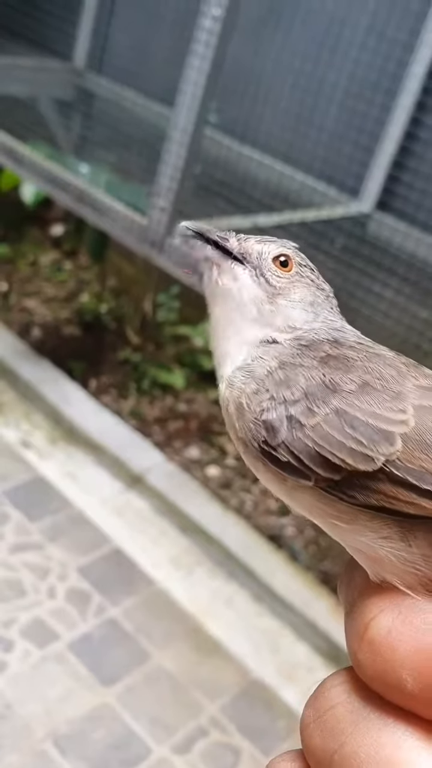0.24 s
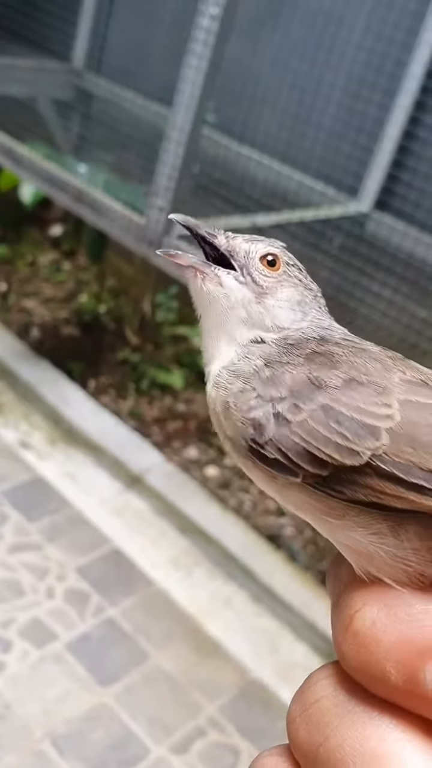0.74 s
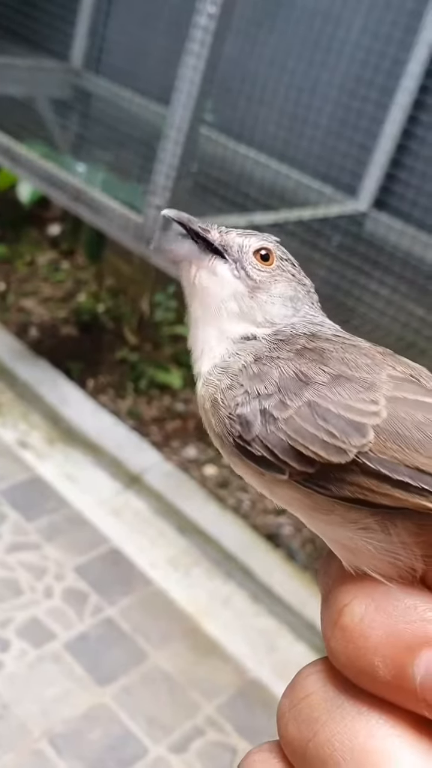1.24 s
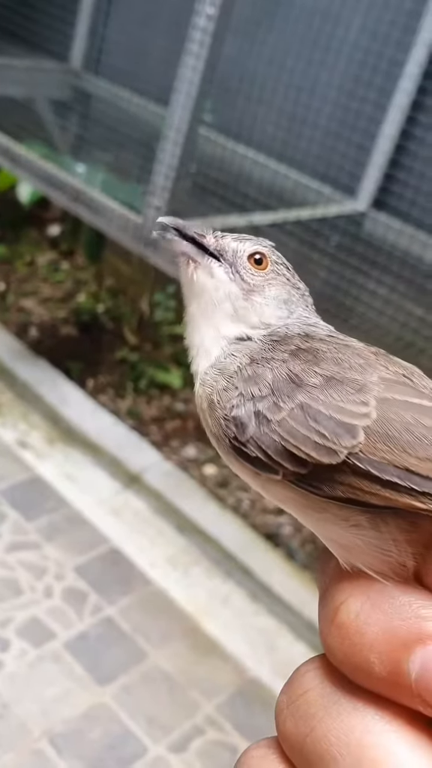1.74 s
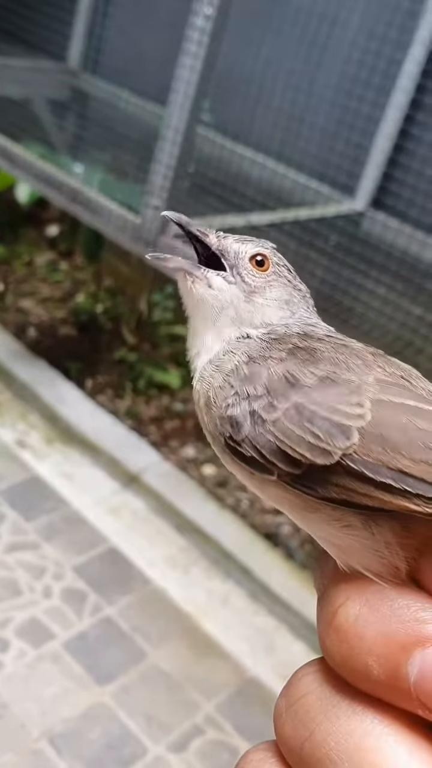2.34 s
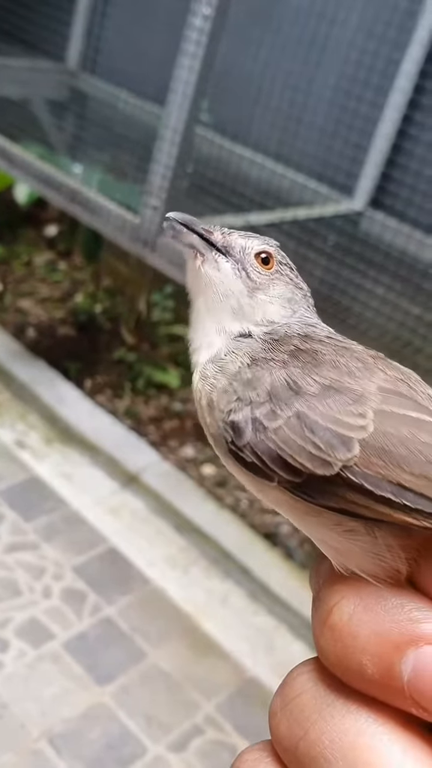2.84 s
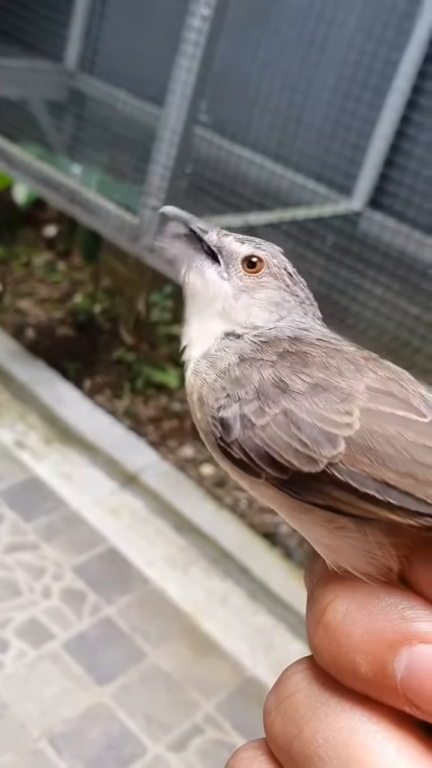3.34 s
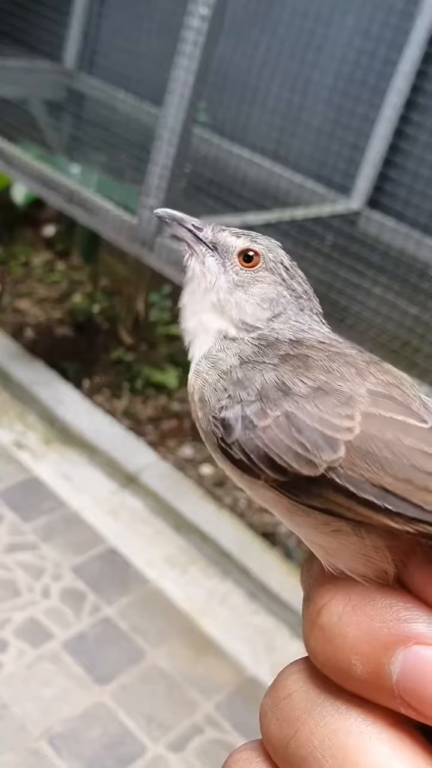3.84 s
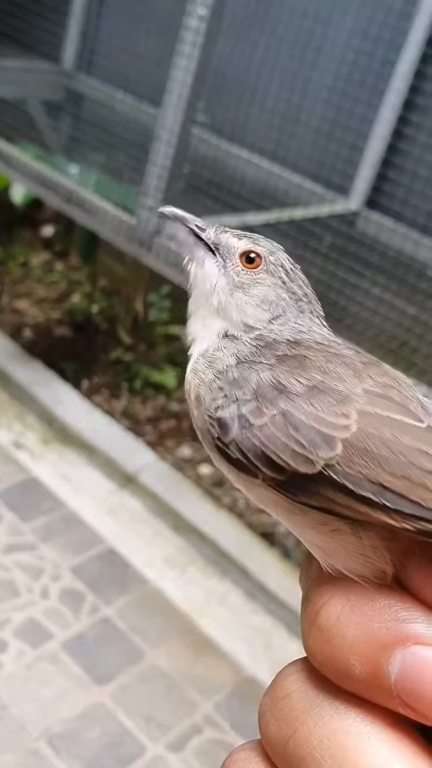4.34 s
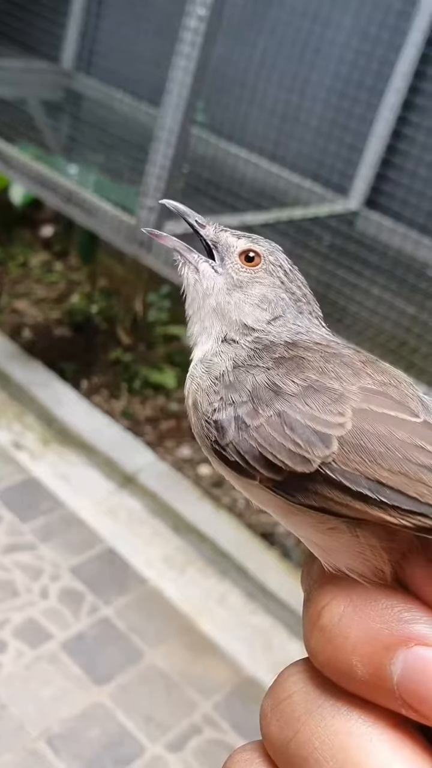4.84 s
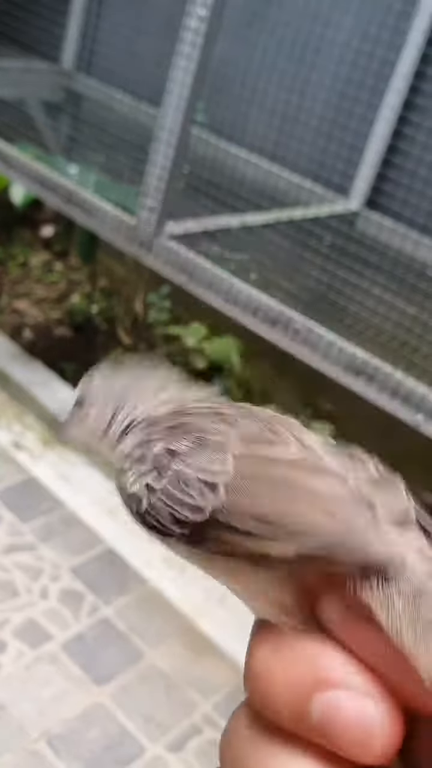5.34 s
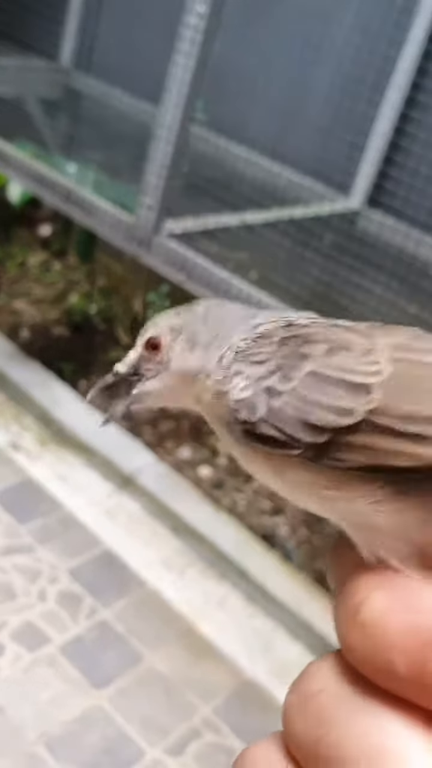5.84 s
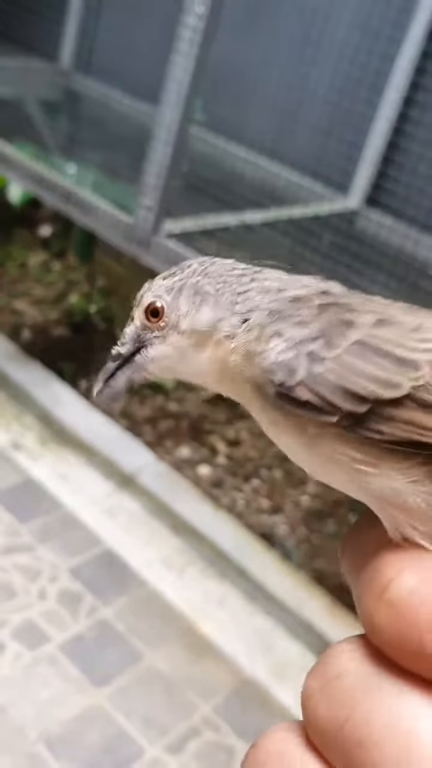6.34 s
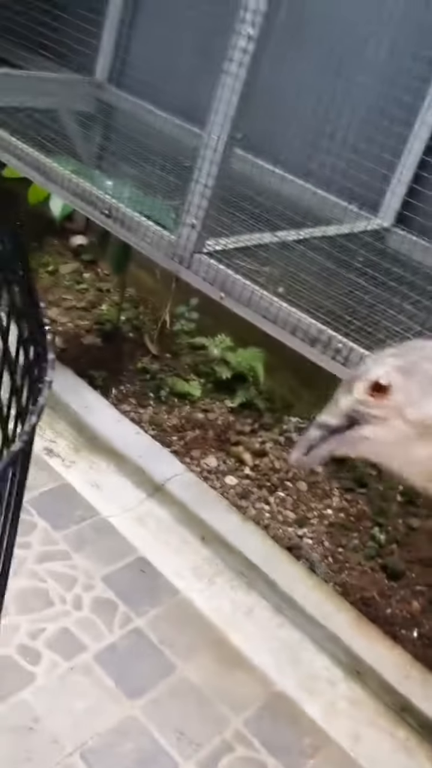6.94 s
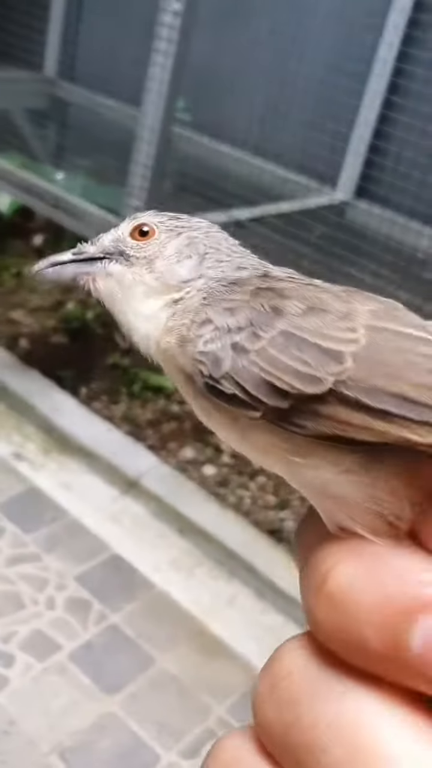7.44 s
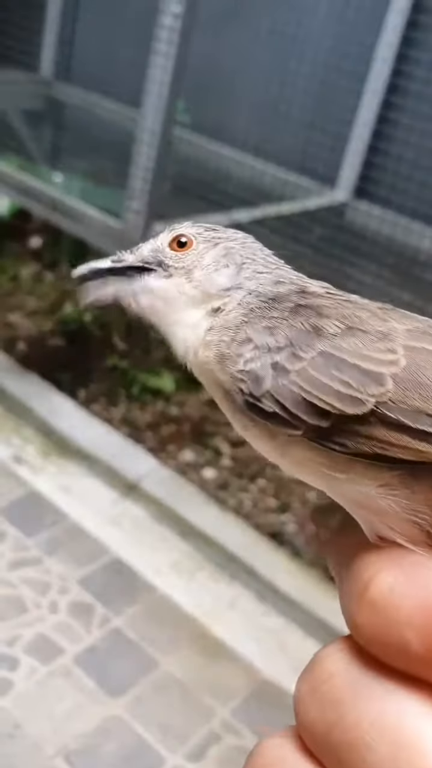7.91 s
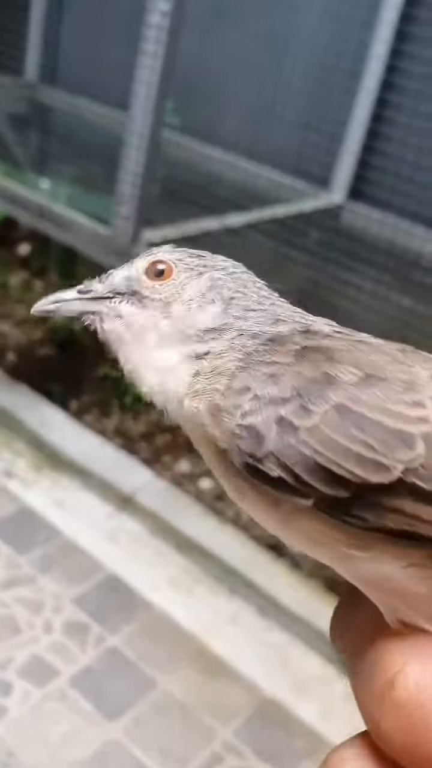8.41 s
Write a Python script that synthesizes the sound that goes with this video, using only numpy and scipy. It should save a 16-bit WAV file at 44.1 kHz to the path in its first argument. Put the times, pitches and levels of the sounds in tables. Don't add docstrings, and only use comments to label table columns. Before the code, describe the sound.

A small warbler sings very close to a phone microphone in a hard-walled yard. Short phrases of falling and rising whistles lead into a long, even, rapid trill. It stops, leaving sparse cheeps and faint whistles from other birds amid near silence, then a second trill bursts out, harsher and brighter, running to the end. Quick echoes surround the notes, with faint rustle and low rumble beneath.

```python
import sys
import numpy as np
from scipy import signal
from scipy.fft import rfft, irfft, next_fast_len
from scipy.io import wavfile
from scipy.ndimage import uniform_filter1d

SR = 44100
rng = np.random.default_rng(int(sys.argv[2]) if len(sys.argv) > 2 else 0)


def boost(x):
    u = np.asarray(x, float) / 20
    return 10 ** u


def output_pcm(signal):
    pcm = np.clip(np.atleast_2d(signal).T, -1, 1) * 32767
    wavfile.write(sys.argv[1], SR, np.round(pcm).astype(np.int16))


N = 382347
LEAD = 4410

# t/s when passing 4500 Hz, level/dB
TRILL_UP = [(2.6687, -7), (2.7326, -6.5), (2.7973, -6.5), (2.8631, -7), (2.9281, -5.5), (2.994, -6),
            (3.0605, -6.5), (3.1282, -5.5), (3.1992, -6.5), (3.2644, -7), (3.3316, -6.5), (3.3963, -7.5),
            (3.4634, -7.5), (3.531, -6.5), (3.5997, -7.5), (3.6664, -7.5), (3.7338, -7), (3.8007, -7.5),
            (3.8669, -7.5), (3.937, -6.5), (4.0043, -6.5), (4.0729, -7), (4.1409, -6.5), (4.209, -5.5),
            (4.277, -6.5), (4.3449, -7), (4.4148, -5.5), (4.4834, -5), (4.5504, -7.5), (4.62, -7)]
# t/s when passing 4500 Hz, level/dB
TRILL_DOWN = [(6.2303, -8), (6.293, -7.5), (6.3566, -8), (6.4213, -7.5), (6.488, -7.5), (6.5529, -7.5),
              (6.62, -7.5), (6.6844, -7.5), (6.7504, -6.5), (6.8159, -7.5), (6.8833, -6), (6.9514, -7.5),
              (7.0169, -8.5), (7.0833, -8), (7.1507, -8), (7.2221, -8), (7.2884, -7)]
# t/s when passing 4500 Hz, level/dB
TRILL_END = [(7.3546, -6), (7.4242, -4.5), (7.4902, -5), (7.5558, -5.5), (7.624, -5), (7.692, -4.5),
             (7.7586, -4.5), (7.826, -5.5), (7.8923, -4.5), (7.9598, -4.5), (8.0294, -5), (8.098, -5),
             (8.1653, -4.5), (8.2322, -4.8), (8.3018, -5), (8.3699, -5), (8.4381, -4.5), (8.5079, -4),
             (8.5743, -5.5), (8.6412, -6)]
# t/s, microphone bend level/dB
POSE = [(0, -18.5), (1, -21.5), (2, -19), (3.5, -18), (4.7, -19.5), (6.07, -16), (6.1, 0), (6.5, -3),
        (6.9, -4), (7.05, 1.5), (7.25, 2.5), (7.37, -8), (7.5, -17.5), (8.7, -14)]


def in_time(rows):
    s, *columns = np.transpose(rows)
    return [np.interp(np.arange(N) / SR, s, column) for column in columns]


def band(x, low_hz, high_hz, order=3):
    return signal.sosfilt(signal.butter(order, [low_hz, high_hz], "band", fs=SR, output="sos"), x)


def coloured(spectrum, low_hz, high_hz):
    size = next_fast_len(N)
    hz = np.arange(1, size // 2 + 2) * SR / size
    points = np.array(spectrum)
    gain = boost(np.interp(np.log(hz), np.log(points[:, 0]), points[:, 1], right=-90))
    noise = irfft(rfft(rng.standard_normal(size)) * gain, size)[:N]
    return noise / np.std(band(noise, low_hz, high_hz))


def wobble(rate_hz, size):
    low_pass = signal.butter(2, rate_hz, fs=SR, output="sos")
    slow = signal.sosfilt(low_pass, rng.standard_normal(size + 2000))[2000:]
    return slow / np.std(slow)


def add(out, s, sound):
    i = round(s * SR) + LEAD
    out[i:i + len(sound)] += sound[:len(out) - i]


def warbler():
    # t/s when passing 4500 Hz, level/dB, speed, top f/Hz,
    # brightness level/dB
    openers = [(-.026, -12, 0.78, 6050, 6), (0.393, -13.5, 1, 5600, -2), (1.1082, -11.5, 0.89, 5570, -1),
               (1.7835, -10.5, .85, 5700, -5.5), (1.8451, -14.5, 1.36, 5580, -2),
               (1.901, -12, 1.35, 5500, -3.5), (1.9536, -10, 1.46, 5620, 0.5),
               (2.0048, -9.5, 1.3, 5700, -1), (2.0566, -8, 1.15, 5640, 0.7), (2.109, -8.5, 1.1, 5560, -1),
               (2.161, -7.5, 1.17, 5720, -2), (2.2151, -7.5, 0.98, 5740, -3),
               (2.5438, -10, 0.83, 5500, -0.2), (2.6056, -12.5, 1.47, 5250, -1.5),
               (6.1073, -12, 1.02, 5760, -2.8), (6.1702, -6.5, 1.26, 5980, -2.5)]
    # t/s, level/dB at 3400 Hz
    swallowed = [
        (1.163, -29),
        (2.2795, -21),
    ]
    # speed, top f/Hz, level/dB at 4300 Hz under the top part,
    # level/dB at 3400 Hz
    voices = [
        (1.14, 6256, 0.7, -10.5),
        (1.12, 6270, -1, -11.5),
        (1.11, 6340, -0.2, -10),
    ]
    # t/s when passing 4500 Hz, level/dB, speed, brightness level/dB
    rising_notes = [(0.491, -15.5, 2.1, -0.5), (.5631, -13, 1.47, -2), (.64, -11, 1.2, -6),
                    (0.7154, -10, 1.17, -5.5), (0.7874, -10.5, 1.27, -6.5), (0.862, -10.5, 1.38, -3.5),
                    (1.2076, -15.5, 2.14, 2.5), (1.2816, -9.5, 1.3, -6), (1.3571, -8.5, 1.14, -5),
                    (1.4311, -9, 1.22, -6.5), (1.5073, -9, 1.34, -7.5)]
    # t/ms from the 4500 Hz crossing, f/Hz
    fall_shape = [(-12, 7400), (-9.5, 6700), (-4.5, 5600), (0.5, 4500), (5, 3300), (10, 2600), (17.5, 2000),
                  (27, 1300)]
    # t/ms from the 4500 Hz crossing, f/Hz
    rise_shape = [(-62, 1440), (-50, 1650), (-39, 2000), (-30, 2400), (-21, 3000), (-10, 3600), (0, 4500),
                  (14, 5600), (15.5, 6000)]

    out = np.zeros(N + LEAD)
    falls = [(s, speed, top_hz, db + bright_db, db, db - 4.5) for s, db, speed, top_hz, bright_db in openers]
    falls += [(s, 1.4, 4500, db - 33, db - 16.5, db) for s, db in swallowed]
    up_s, down_s = TRILL_UP[0][0], TRILL_DOWN[0][0]
    trills = (TRILL_UP, TRILL_DOWN, TRILL_END)
    for notes, voice, start_s in zip(trills, voices, (up_s, down_s, down_s)):
        falls += list(trill(notes, np.array(voice), start_s))
    glides(out, falls, fall_shape, edge_hz=956, depth=1.031)
    rises = [(s, speed, 5516, db + bright_db + 2, db + 0.45, db - 5) for s, db, speed, bright_db in rising_notes]
    glides(out, rises, rise_shape, edge_hz=300, depth=1.09)
    return out


def trill(notes, voice, start_s):
    # speed, top f/Hz, middle level/dB, low level/dB
    scatter = (.04, 80, 1.2, .7)
    fresh_speed, fresh_s = 0.088, 0.3
    s, db = np.transpose(notes)
    varied = voice + np.array(scatter) * rng.standard_normal((len(s), 4))
    speed, top_hz, mid_db, base_db = varied.T
    speed = speed + fresh_speed * np.exp((start_s - s) / fresh_s)
    return np.transpose([s, speed, top_hz, db + 0.64, db + mid_db - 0.8, base_db])


def glides(out, notes, shape, edge_hz, depth):
    # f/Hz, level/dB under that at 3400 Hz
    throat = [(1400, -59), (1800, -31.5), (2400, -20.5), (2700, -13), (3000, -7.5), (3400, 2)]
    ms, pitch = np.transpose(shape)
    low_hz, low_db = np.transpose(throat)
    for s, speed, top_hz, high_db, mid_db, base_db in notes:
        hz = np.interp(np.arange(ms[0], ms[-1], 1000 * speed / SR), ms, pitch)
        hz = uniform_filter1d(hz, size=90, mode="nearest")
        throat_db = depth * turned(s) * low_db + base_db
        db = np.interp(hz, [*low_hz, 4300, 5200], [*throat_db, mid_db, high_db])
        db = uniform_filter1d(db, size=40, mode="nearest")
        db -= 14 * np.maximum(1 + (hz - top_hz) / edge_hz, 0) ** 2
        unsteady_db = 1.52 + 2.2 * np.clip((3000 - hz) / 800, 0, 1)
        db += unsteady_db * wobble(320, len(hz))
        add(out, s + ms[0] / speed / 1000, boost(db) * np.sin(2 * np.pi * np.cumsum(hz) / SR))


def turned(s):
    times, bend_db = np.transpose(POSE)
    return 1 - 0.0093 * max(np.interp(s, times, bend_db) + 18, 0)


def neighbour():
    # t/s, length/s, start f/Hz, end f/Hz, level/dB
    cheeps = [(0.05, 0.13, 4755, 4810, -23.5), (1.231, 0.048, 4595, 4620, -16),
              (2.446, 0.12, 4560, 4765, -24.5), (2.576, 0.051, 4640, 4440, -37),
              (3.523, 0.067, 4700, 4767, -26), (4.655, 0.078, 4587, 4720, -23.5),
              (5.978, 0.0845, 4664, 4780, -21), (7.54, 0.078, 4540, 4880, -20.5)]
    # t/s, length/s, f/Hz,
    # level/dB
    whistles = [
        (1.295, .055, 4640, -28),
        (2.3, .2, 420, -69),
        (3.996, .55, 370, -61),
        (4.996, 0.29, 400, -65),
        (5.092, .14, 5950, -52.5),
        (5.12, .1, 4400, -52),
        (5.346, 0.071, 5950, -48),
        (5.352, .07, 3500, -51),
        (5.61, .05, 5930, -62),
    ]
    out = np.zeros(N + LEAD)
    near = [(*row, -31.5 + 0.26 * (row[-1] + 22)) for row in cheeps]
    far = [(s, length, hz, hz, db, db - 27) for s, length, hz, db in whistles]
    for s, length, start_hz, end_hz, db, octave_db in near + far:
        u = np.linspace(0, 1, round(length * SR))
        hz = start_hz + (end_hz - start_hz) * np.sqrt(u)
        hz = hz * (1 + 0.016 * wobble(120, len(u)))
        phase = 2 * np.pi * np.cumsum(hz) / SR
        swell = np.sin(np.pi * u ** 0.67) ** 0.47 * boost(3.36 * wobble(90, len(u)))
        octave = boost(octave_db) * np.sin(2 * phase + 0.4 * wobble(200, len(u)))
        add(out, s, swell * (boost(db) * np.sin(phase) + octave))
    return out


def yard(x, t60, first_s, early_db, early_t60):
    t = np.arange(round(0.8 * SR)) / SR
    fading = boost(-60 * t / t60) + boost(early_db - 60 * t / early_t60)
    echo = rng.standard_normal(len(t)) * fading
    echo = np.r_[np.zeros(round(first_s * SR)), echo / np.sqrt(np.sum(echo ** 2))]
    return signal.fftconvolve(x, echo)[LEAD:N + LEAD]


def surroundings(gate_db):
    # f/Hz, level/dB per Hz
    rustle_spectrum = [(350, -26), (600, -15), (950, -4.5), (1600, -6.5), (2500, -5), (3500, 0.5),
                       (4400, -0.5), (5200, -4.5), (6000, 1), (7200, -11), (9500, -13), (13000, -19)]
    # f/Hz, level/dB per Hz
    rumble_spectrum = [(15, -16.5), (30, -10.5), (62, 3), (110, -14.5), (170, -8.5), (260, -16),
                       (370, -15.5), (550, -24.5), (1000, -28.5), (2200, -35)]
    rustle = boost(gate_db + 1.4 * wobble(25, N)) * coloured(rustle_spectrum, 750, 2530)
    rumble_db = -58.5 + 0.2 * (gate_db + 57.0) + 3.0 * wobble(10, N)
    return rustle + boost(rumble_db) * coloured(rumble_spectrum, 40, 400)


def gate():
    # t/s of opening, t/s held until, level/dB of the surroundings let through
    openings = [(0, 0.017, -58.5), (0.041, 0.097, -58.5), (0.382, 0.887, -60.5), (1.064, 1.2, -58),
                (1.203, 1.553, -52), (1.761, 1.873, -49), (1.87, 2.299, -53.5), (2.425, 2.466, -58),
                (2.47, 4.68, -57), (4.808, 4.912, -57), (5.082, 5.17, -53), (5.332, 5.42, -56),
                (5.504, 5.58, -61), (5.6, 5.63, -65), (5.7, 5.78, -83), (5.987, 6.04, -69),
                (6.086, 8.7, -58)]
    close_db_per_s = 146.5
    t, db = np.arange(N) / SR, np.full(N, -86.)
    for start, hold, open_db in openings:
        closing_db = open_db - close_db_per_s * np.maximum(t - hold, 0)
        db = np.maximum(db, np.where(t < start, -99, closing_db))
    return uniform_filter1d(db, size=500, mode="nearest")


def scene():
    song, far, gate_db = warbler(), neighbour(), gate()
    closing = boost(0.5 * np.minimum(gate_db + 71.5, 0))

    spread = song + 0.73 * band(song, 1500, 4040, order=2) + boost(-10) * band(song ** 2, 9800, 10500)
    sway = 2 * np.pi * 1.5 * np.arange(N + LEAD) / SR
    echo = sum(yard(spread * side, t60=0.41, first_s=0.0035, early_db=1, early_t60=0.071)
               for side in (np.cos(sway), np.sin(sway)))
    echo_db = -10.5 + 0.17 * (in_time(POSE)[0] + 20)
    echo = boost(echo_db) * echo

    far_echo = yard(far, t60=0.46, first_s=0.003, early_db=2.5, early_t60=0.045)
    distant = boost(-5.5) * far[LEAD:] + boost(-0.5) * closing ** 1.3 * far_echo
    return np.tile(song[LEAD:] + closing * echo + distant + surroundings(gate_db), (2, 1))


def grit(x):
    # f/Hz, level/dB per Hz
    grit_spectrum = [(60, -11), (300, -2.5), (500, -8.5), (900, -1.5), (1500, -7.5), (3000, -7.5),
                     (7500, -5.5), (11000, -9.5), (13200, -5)]
    power = np.abs(uniform_filter1d(uniform_filter1d(x ** 2, size=260), size=160))
    power = np.roll(power, 130)
    return boost(-18.5) * power ** 0.75 * coloured(grit_spectrum, 200, 15000)


def dropouts(x):
    f, _, z = signal.stft(x, SR, nperseg=1024)
    power = np.abs(z[0]) ** 2
    loud = power.sum(axis=0)
    edges = np.searchsorted(f, [6700, 7500, 8400, 9300, 10400, 11500, 12400, 13300])
    for low, high in zip(edges, edges[1:]):
        limit_db = -39.5 + 5.5 * rng.standard_normal(len(loud))
        limit = loud * boost(2 * limit_db)
        z[:, low:high] *= np.where(power[low:high].sum(axis=0) < limit, boost(-21.5), 1)
    return signal.istft(z, SR, nperseg=1024)[1][:, :N]


def swap_noise(x):
    # start t/s, length/s, level/dB of the channel difference under their sum
    strong = [(0.399, .064, -3), (0.566, 0.022, -1.7), (.762, .225, -4.5), (1.411, .162, -8),
              (2.16, 0.042, -5), (2.246, 0.034, -4), (2.929, .051, -5), (2.999, .027, -1),
              (3.067, .046, -4), (3.599, .052, -7.5), (4.135, .026, -4.5), (4.204, 0.026, -2),
              (6.128, .028, -3), (.49, 0.028, -2), (6.549, .12, -9), (6.703, 0.025, -5.4),
              (6.778, 0.027, -6), (7.014, .026, -4), (7.08, .03, -1), (7.359, .033, -9),
              (7.436, 0.042, -4.5), (7.604, 0.036, -.9), (7.685, .046, -4), (7.763, 0.021, -4),
              (7.833, 0.028, -4), (8.494, .028, -4), (8.058, 0.025, -7), (8.105, .046, -9),
              (8.173, 0.043, -7), (8.239, .048, -4)]
    out = x.copy()
    notes = np.array(TRILL_UP + TRILL_DOWN + TRILL_END)[:, 0]
    luck = rng.random((len(notes), 2))
    weak = [(s, 0.035, -12.5 + 8 * (b - 0.5)) for s, (a, b) in zip(notes, luck) if a < 0.5]
    swaps = weak + list(strong)
    for low_hz, high_hz in [(4000, 4700), (4700, 5500), (5500, 6550), (9200, 10000), (11800, 13000)]:
        share = np.zeros(N)
        for (start, length, side_db), chance in zip(swaps, rng.random(len(swaps))):
            if low_hz > 6800 and chance < 0.5:
                continue
            ratio = boost(2 * side_db)
            share[round(start * SR):round((start + length) * SR)] = min(2 * ratio / (1 + ratio), 1)
        share = np.abs(uniform_filter1d(share, size=200))
        sos = signal.butter(3, [low_hz, high_hz], "band", fs=SR, output="sos")
        part = signal.sosfiltfilt(sos, x[0])
        envelope = np.sqrt(np.abs(uniform_filter1d(part ** 2, size=350)))
        noise = signal.sosfiltfilt(sos, rng.standard_normal((2, N)))
        noise = np.sqrt(share) * envelope * noise / np.std(noise)
        out += (np.sqrt(np.abs(1 - share)) - 1) * part
        out += band(noise, 0.71 * low_hz, 1.1 * high_hz)
    return out


def microphone(dry):
    bend_db, = in_time(POSE)
    facing = np.clip((bend_db + 19.5) / 9, 0, 1)
    push = facing * dry + (1 - facing) * 1.23 * band(dry, 2200, 4630, order=2)
    low_pass = signal.butter(2, 1800, fs=SR, output="sos")
    bump = signal.sosfilt(low_pass, np.roll(push, 70, axis=1) ** 2)
    octave = boost(2.5) * band(dry ** 2, 5500, 10300)
    loudness = np.abs(uniform_filter1d(dry[0] ** 2, size=130)) ** 0.5
    strained = np.clip(loudness / 0.074, 0.25, 1)
    cube = -0.1 * dry ** 3 + 0.12 * band(dry ** 3, 8000, 13000)
    return dry + boost(bend_db) * strained * (bump + octave) + cube


def top_cut(x):
    return signal.sosfilt(signal.butter(12, 13180, fs=SR, output="sos"), x)


def record(dry):
    bent = microphone(dry)
    rough = swap_noise(dropouts(bent + grit(dry[0])))
    limited = signal.sosfilt(signal.cheby2(16, 45, 13400, fs=SR, output="sos"), rough)
    return top_cut(np.clip(limited, -0.97, 0.97))


dry = scene()
out = record(dry)
output_pcm(out)
```